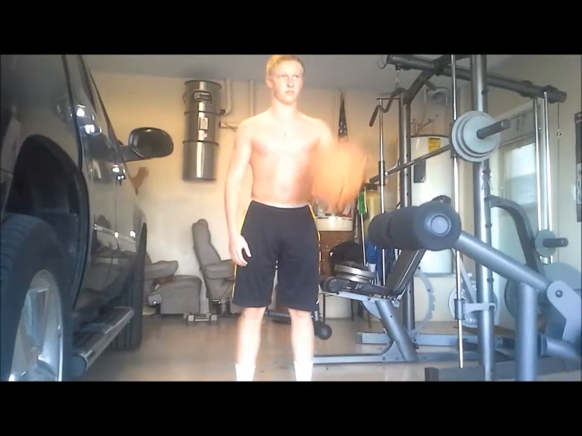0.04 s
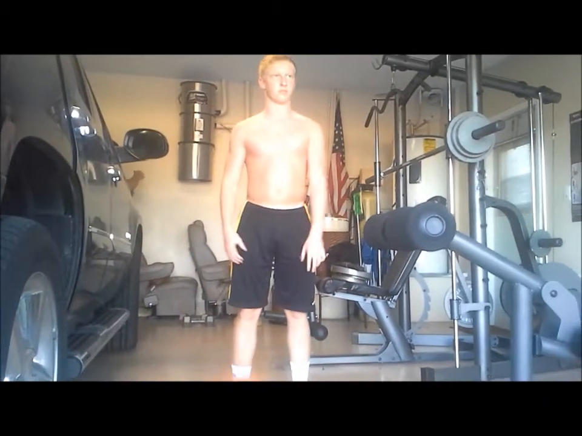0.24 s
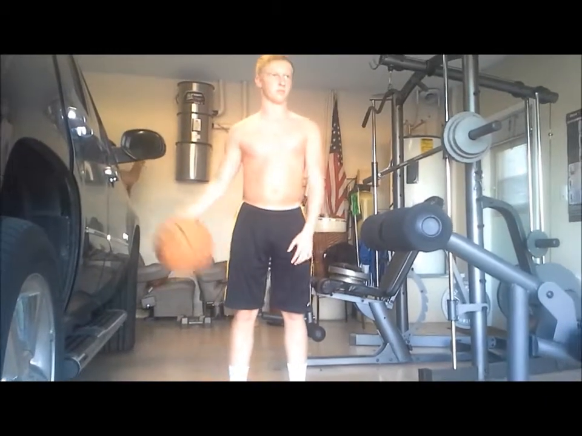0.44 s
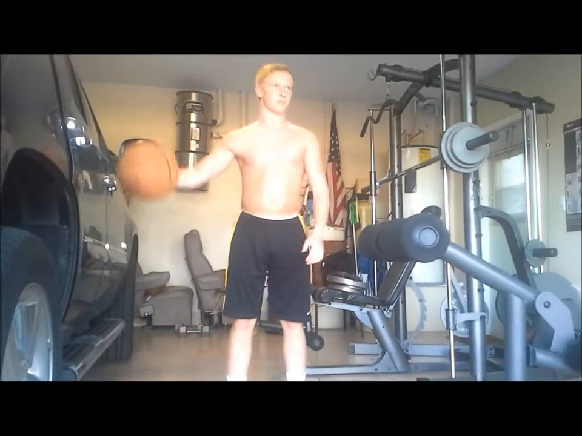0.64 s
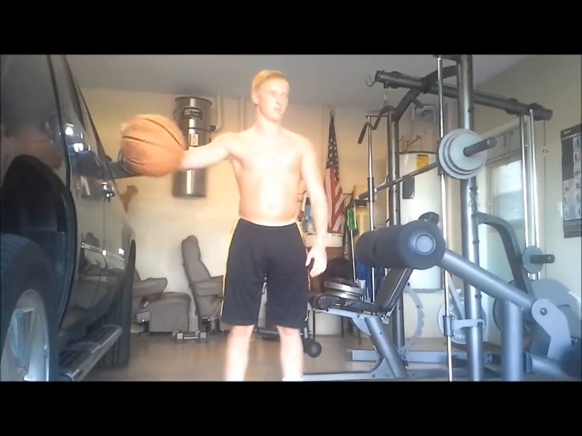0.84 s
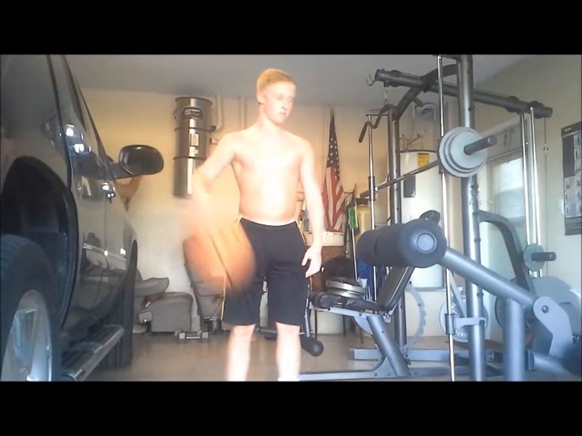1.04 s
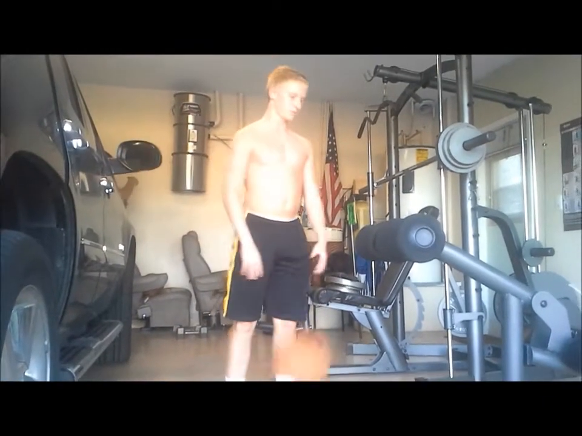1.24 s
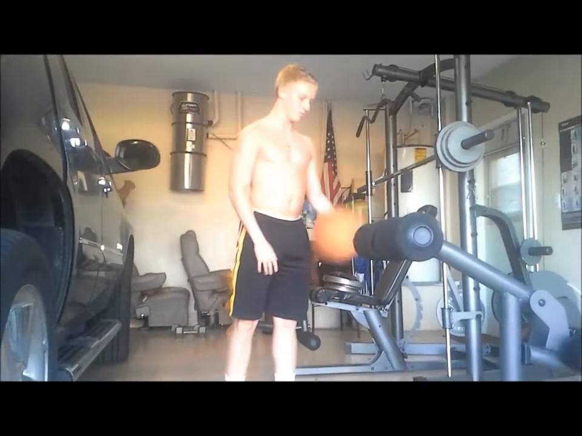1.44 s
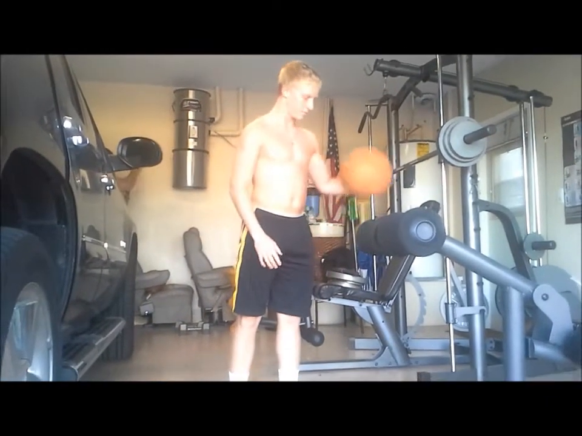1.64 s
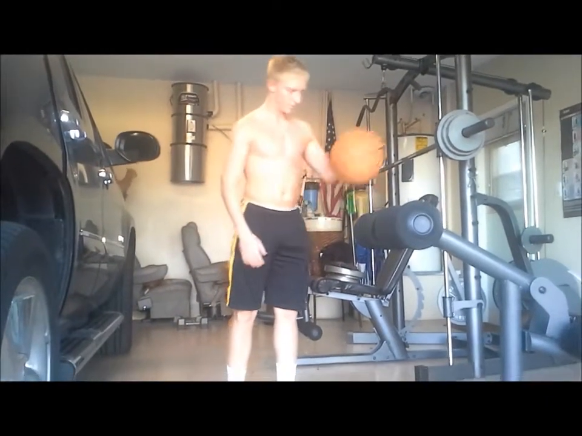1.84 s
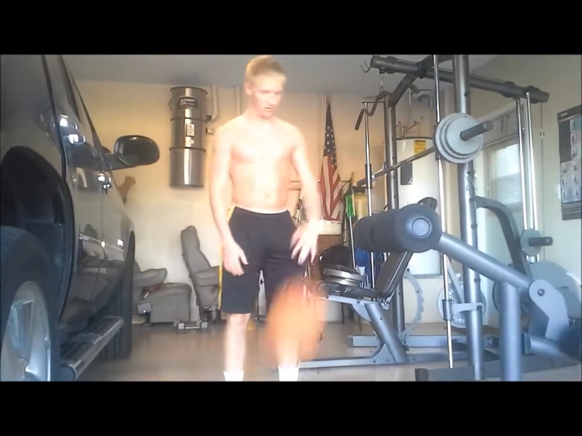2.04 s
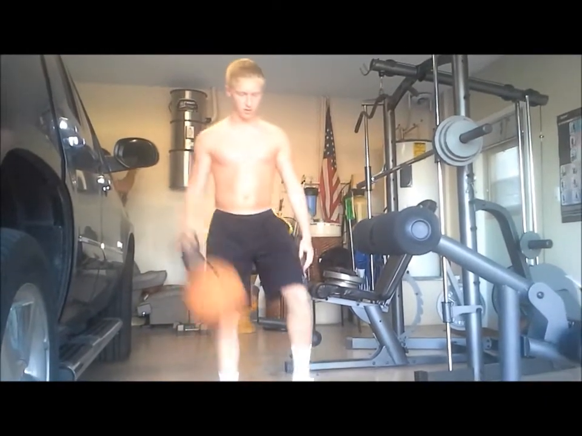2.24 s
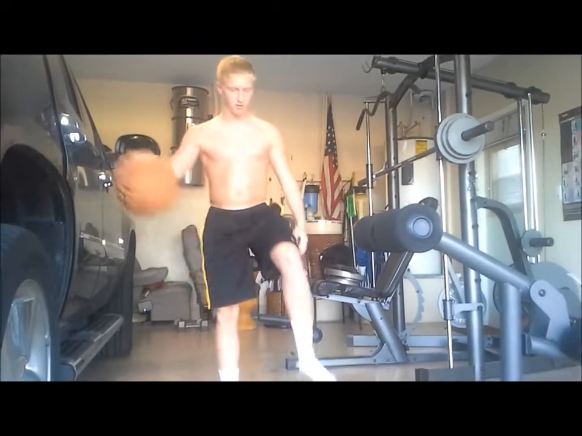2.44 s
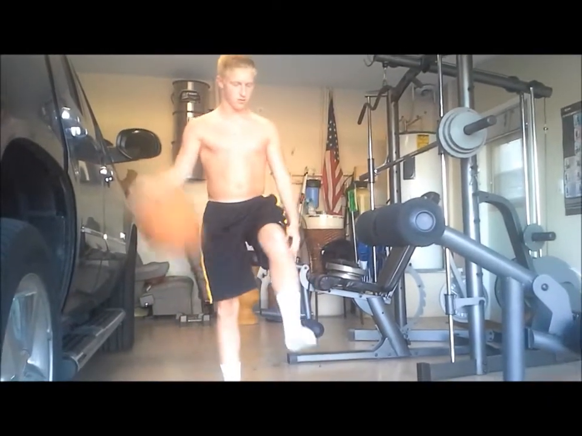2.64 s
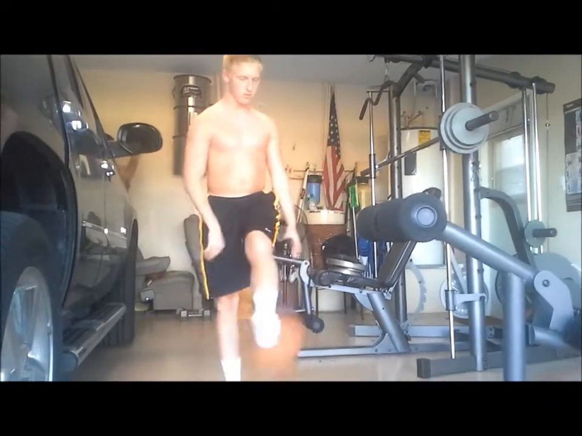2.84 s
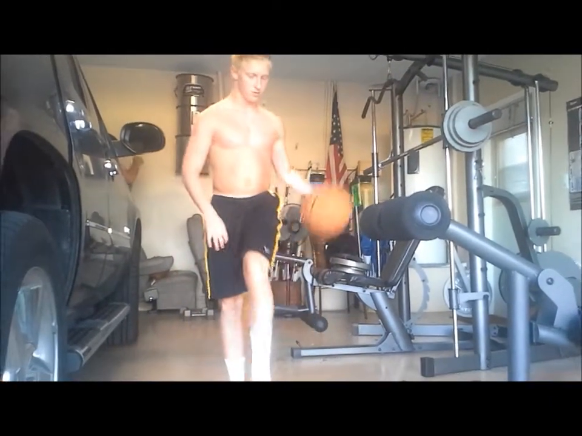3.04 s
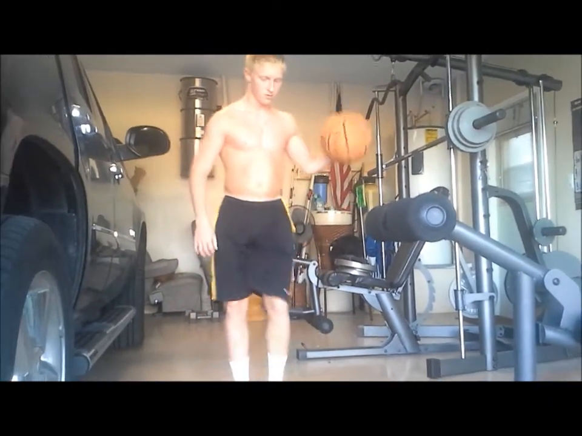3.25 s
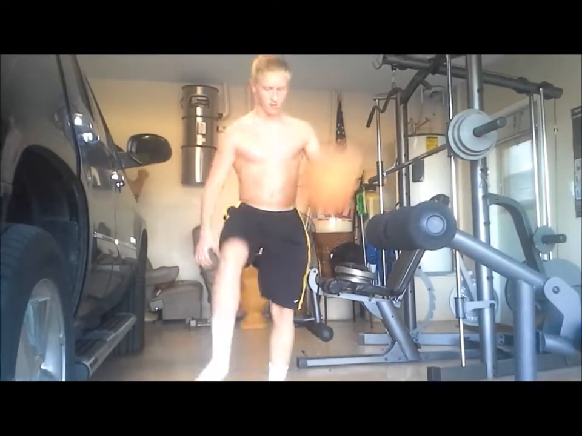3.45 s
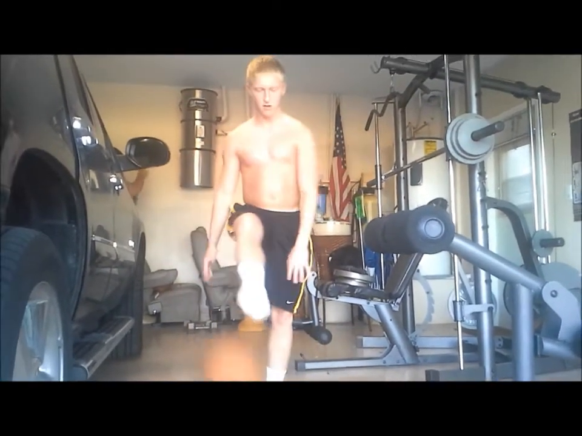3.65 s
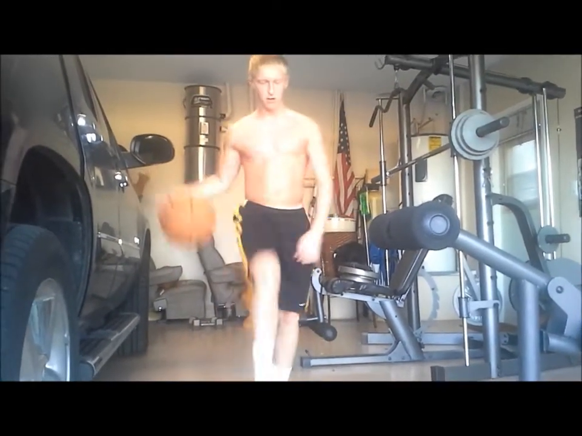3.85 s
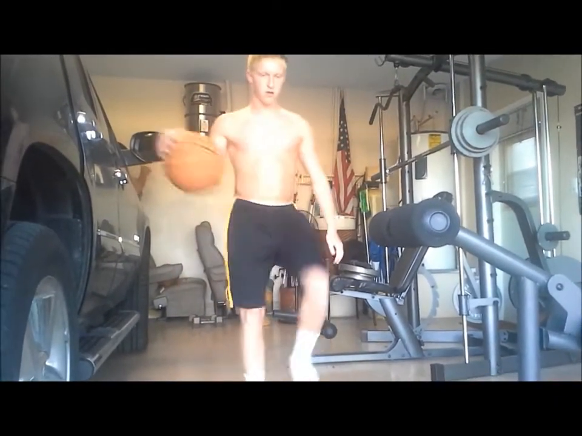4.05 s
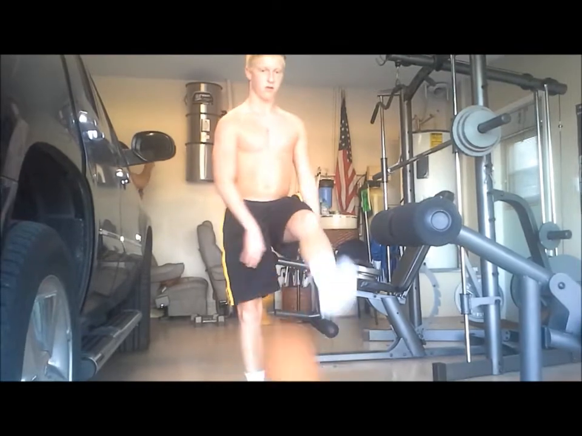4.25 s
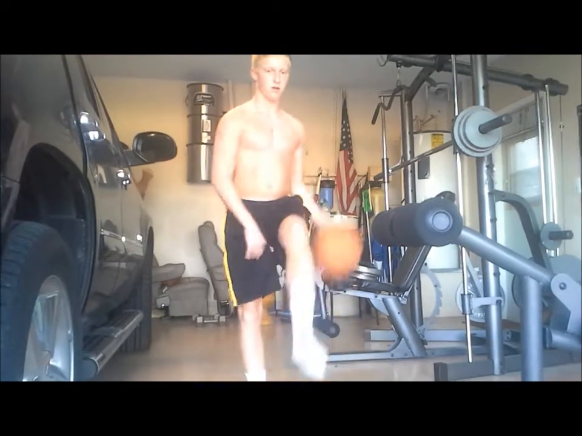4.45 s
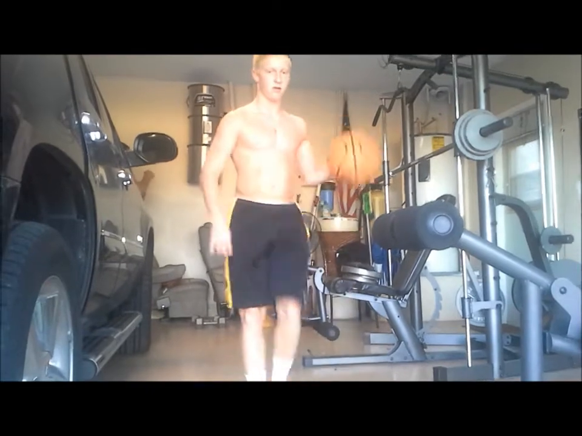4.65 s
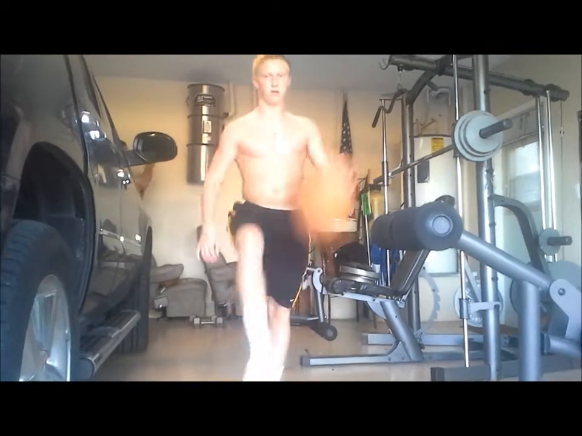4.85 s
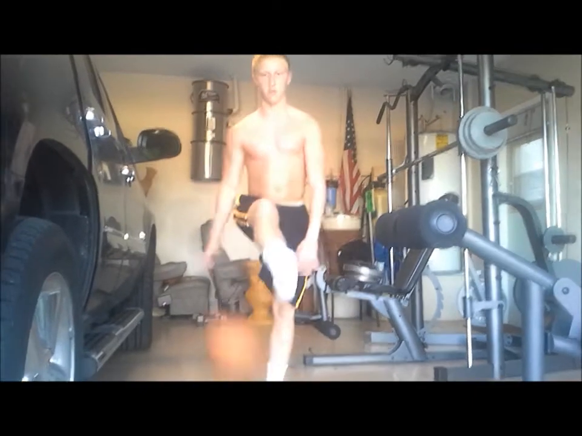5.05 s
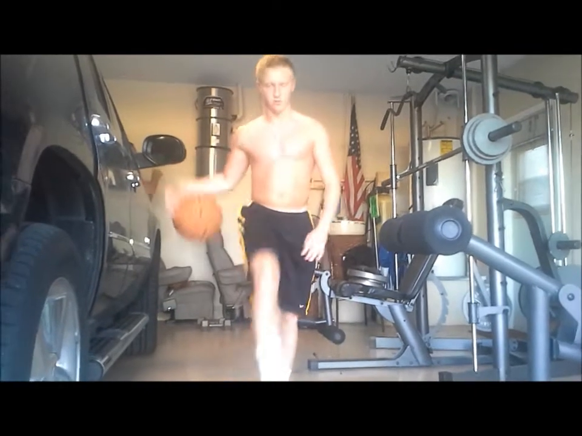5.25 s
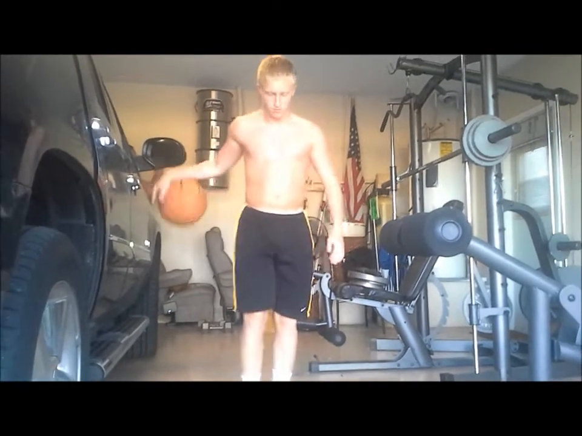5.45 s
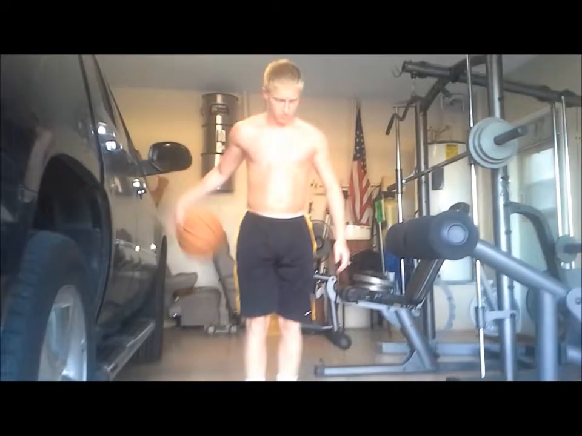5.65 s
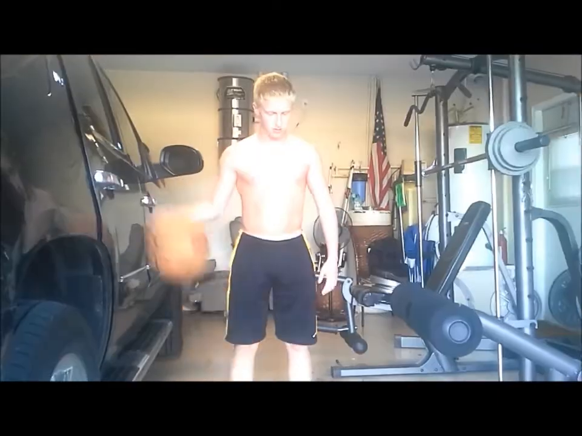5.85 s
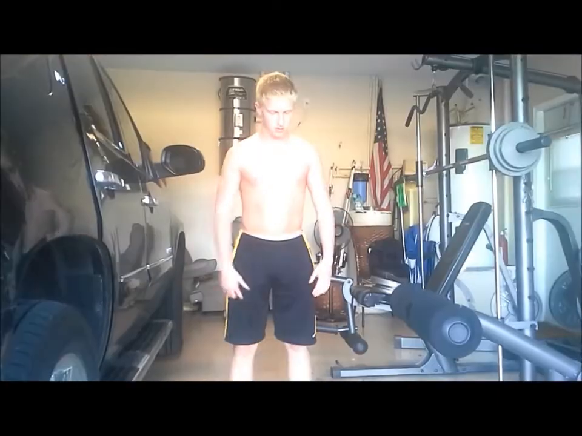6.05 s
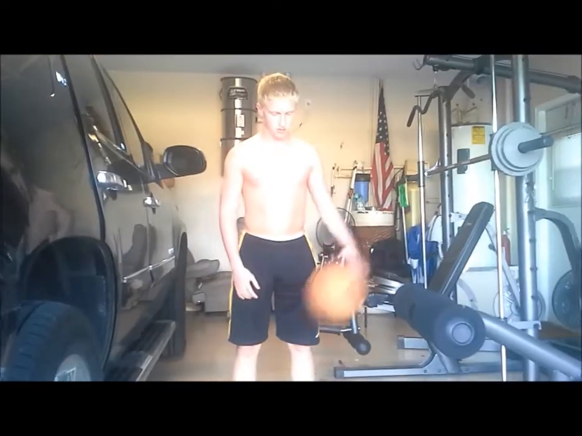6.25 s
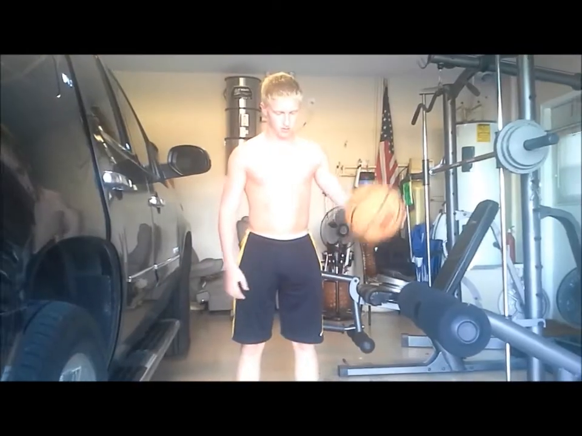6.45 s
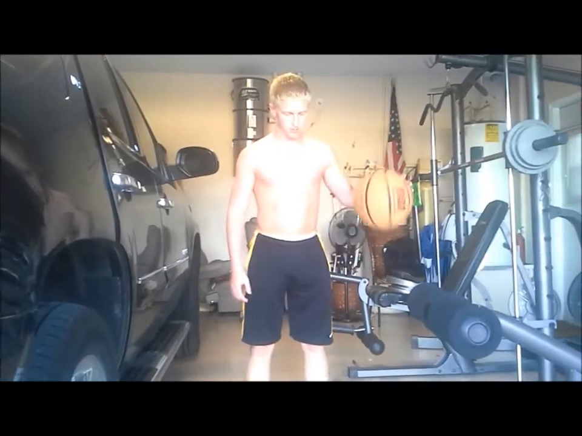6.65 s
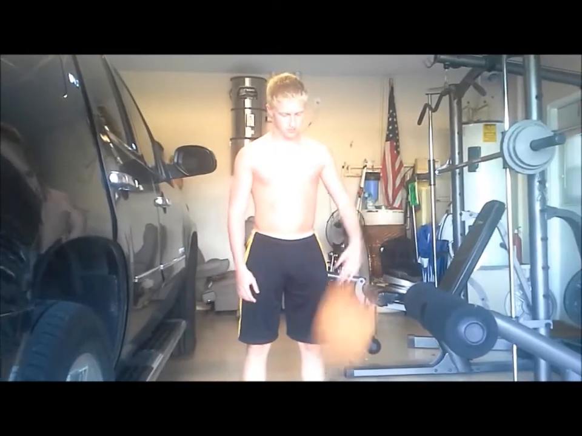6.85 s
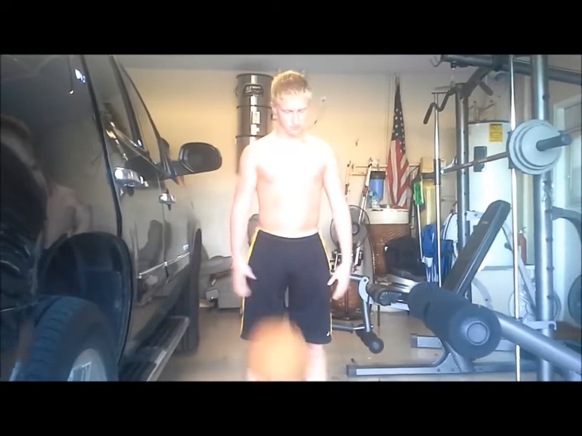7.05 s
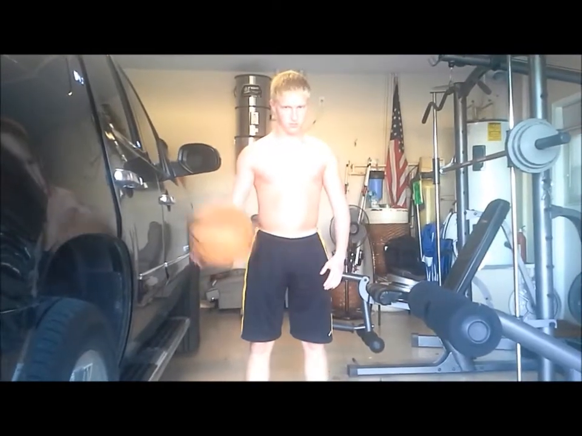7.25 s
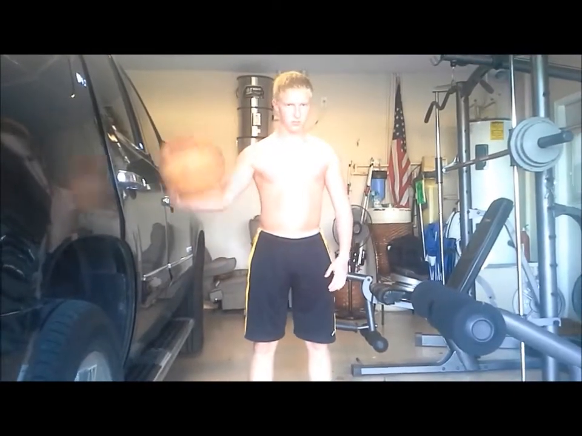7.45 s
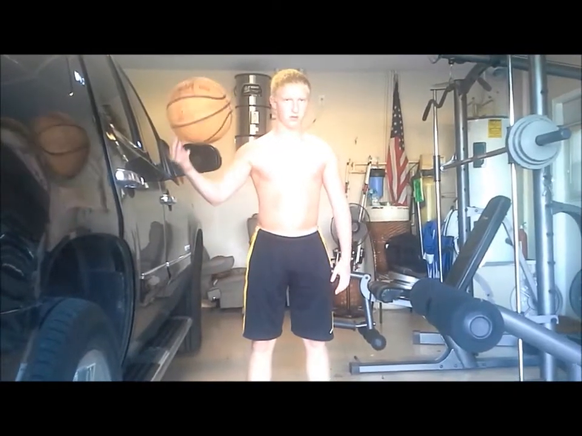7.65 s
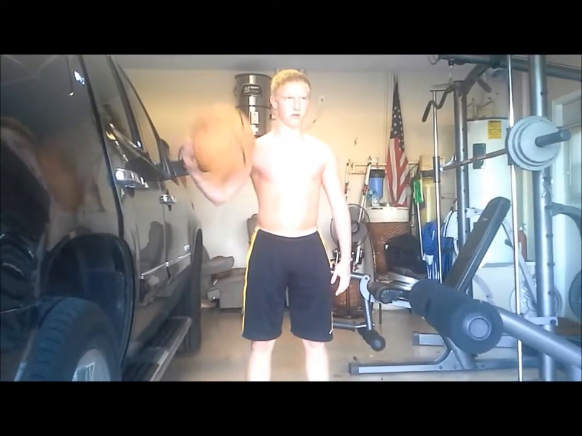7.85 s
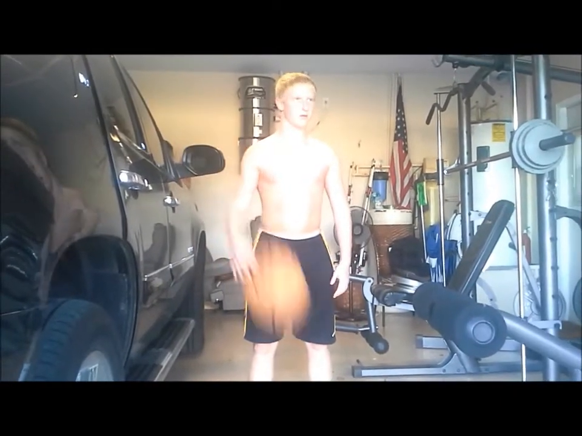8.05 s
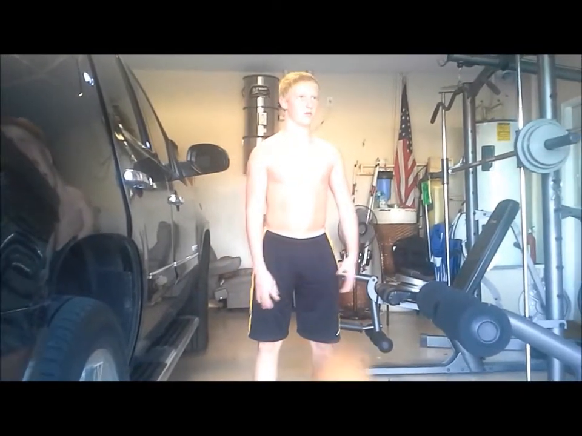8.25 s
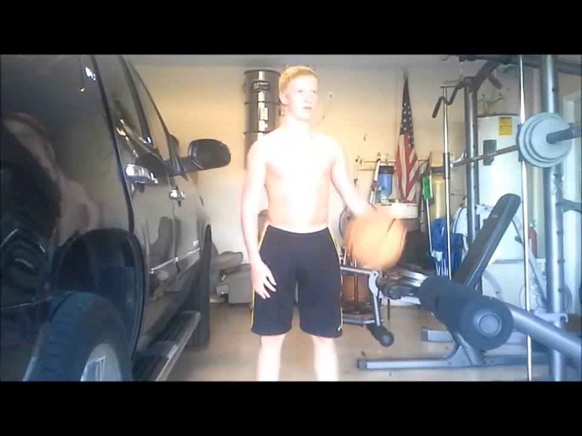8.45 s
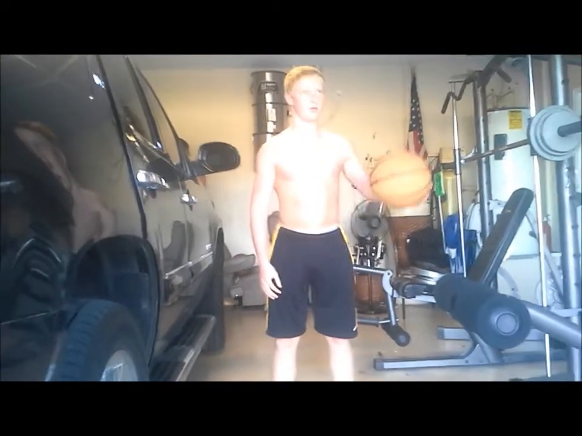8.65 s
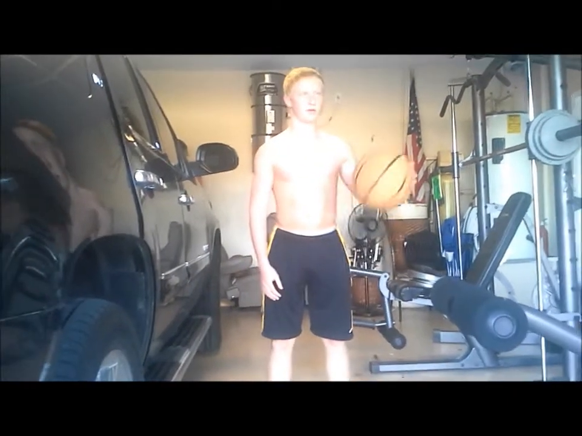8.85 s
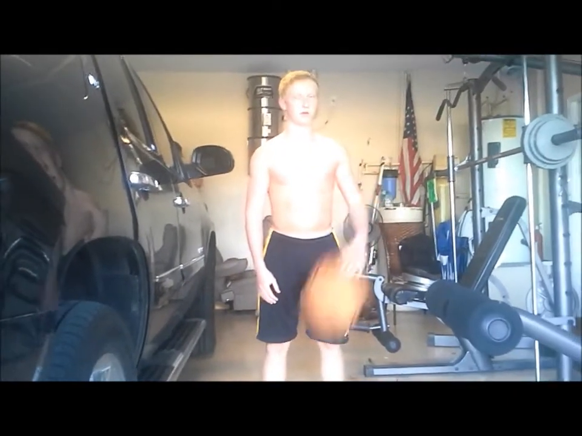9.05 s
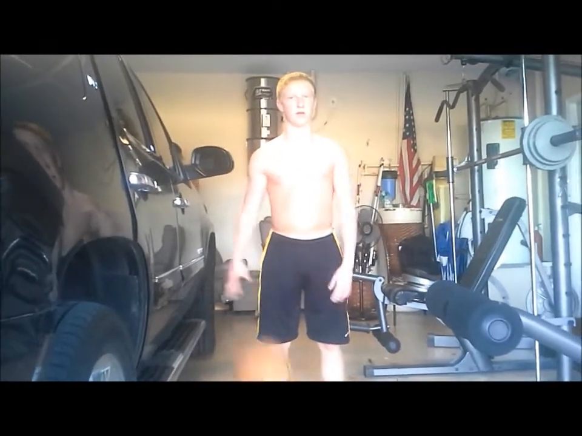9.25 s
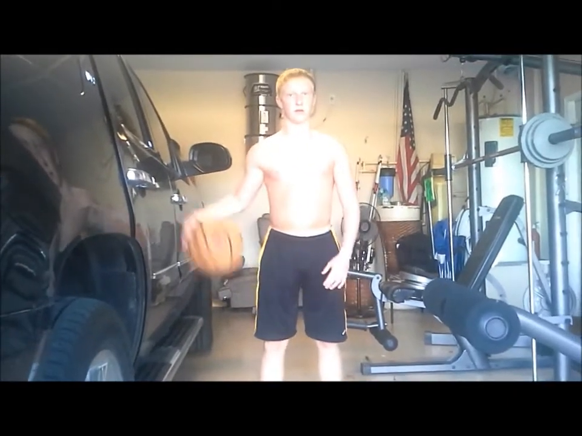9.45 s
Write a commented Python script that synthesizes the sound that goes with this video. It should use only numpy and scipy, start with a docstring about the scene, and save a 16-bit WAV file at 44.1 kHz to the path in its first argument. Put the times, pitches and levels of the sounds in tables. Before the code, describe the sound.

Sharp, boomy basketball bounces echo in a hard-walled garage with light hand slaps and shoe scuffs, dropping silent once, then resuming from another spot.

```python
"""A hard-walled garage: a basketball is dribbled on concrete, heard from one spot, then, after silence, a second.
Each bounce sums a squeezed-air pulse with room modes, a noise slap of rubber, and decaying modes for the ball's ping
and a beating steel part. Hands catch and slide as resonant noise; feet drag as dull noise and knocks are low modes.
Falling sines whistle faintly over coloured noise: a faint rumble and a hiss that swells in surges."""
import sys
import numpy as np
from scipy import signal
from scipy.fft import rfft, irfft
from scipy.io import wavfile

SR = 44100
rng = np.random.default_rng(int(sys.argv[2]) if len(sys.argv) > 2 else 0)


def file_out(sig):
    """Save sig as 16-bit WAV at sys.argv[1]."""
    # one column per channel
    cols = np.atleast_2d(sig).T
    # limit, then scale
    lim = np.clip(cols, -1, 1)
    pcm = np.round(lim * 32767).astype(np.int16)
    wavfile.write(sys.argv[1], SR, pcm)


N = 418950
TIME = np.arange(N) / SR
AGE = np.arange(SR) / SR   # the second that follows a contact

# Levels in the tables are relative: each sound's own shaping and mix gain come on top.
# thin hiss in surges, each lasting until the next: start_s, level_db, rise_s
SURGES = [(0, -39.5, .015), (0.61, -39, .03), (1.04, -32, .065), (1.671, -34, .035), (1.885, -39, .02),
          (2.28, -36.5, .06), (2.901, -36, .02), (3.551, -36, .03), (4.149, -35, .02), (4.76, -36, .03),
          (5.341, -36, .04), (6.4, -37, .03), (6.79, -34, .03), (7.001, -38, .02), (7.335, -36.5, .015),
          (7.56, -38, .02), (7.929, -34, .03), (8.14, -34.5, .04), (8.7, -38, .03), (9.08, -32.5, .04),
          (9.27, -36.5, .02)]
SURGE_FALL_S = 0.065   # back into the lull
SURGE_SAG_DB_PER_S, LULL_DB = 12.5, -13
# colour of the hiss: frequency_hz, density_db (per Hz)
HISS_COLOUR = [(800, -50.5), (2000, -24.5), (4000, -16.5), (5900, -14), (7000, -4), (8200, -1.5),
               (10000, -2.5), (13000, -4), (16000, -8)]
# colour of the rumble: frequency_hz, density_db (per Hz)
RUMBLE_COLOUR = [(20, -1.5), (60, 6), (130, 0.5), (250, -2.5), (450, -1.5), (700, -4.5), (1100, -4.5),
                 (2000, -13.5), (5000, -31)]
RUMBLE_START_DB, RUMBLE_END_DB = -62, -58   # slow growth, before the hiss's swing is added
RUMBLE_FOLLOWS = 0.3   # share of the hiss's swing

# faint falling whistles: start_s, start_pitch_hz, level_db
WHISTLES = [(0.17, 13900, -43), (1.46, 14300, -58), (2.03, 15000, -48), (2.66, 14100, -43),
            (3.30, 15200, -41), (3.95, 13700, -47), (5.73, 13700, -47.5), (8.168, 12660, -30.5)]
WHISTLE_S, WHISTLE_FALL_HZ_PER_S = 0.14, 15000

# feet shifting on the floor: start_s, length_s, level_db
SHUFFLES = [(.2, 0.15, -59), (2.574, 0.067, -41), (2.912, 0.059, -47.5), (3.381, 0.12, -41.5),
            (3.59, 0.13, -44.5), (4.167, 0.1, -46), (4.77, 0.13, -47.5), (5.566, 0.41, -46),
            (6.421, 0.13, -49.5), (7.679, 0.22, -48), (7.948, 0.23, -56)]
# colour of a dragging sole: frequency_hz, density_db (per Hz)
SHUFFLE_COLOUR = [(50, -17), (130, 12), (260, 1.5), (430, 8), (700, -4), (1000, -8.5), (1700, -12.5)]

# dull knocks: start_s, pitch_hz, level_db, t60_s
KNOCKS = [(0.213, 542, -38.5, 0.067), (2.589, 385, -39.5, 0.38), (8.665, 94, -35.5, 0.1)]

# hands on the ball, short for a catch and long for a slide:
# start_s, length_s, skin_level_db, skin_resonance_hz, pat_level_db, palm_resonance_hz
TOUCHES = [(0.333, 0.031, -64, 6000, -46.5, 2580), (0.941, 0.018, -30.5, 5600, -44.5, 1920),
           (1.088, 0.19, -28, 8100, -49.5, 2850), (1.198, 0.029, -25, 6460, -42, 3800),
           (1.721, .055, -27.5, 6600, -44, 2850), (2.144, 0.035, -32, 5850, -44, 1950),
           (2.913, 0.083, -39, 7160, -50, 3000), (3.39, 0.071, -34, 8400, -35.5, 900),
           (3.643, 0.042, -25, 6700, -41, 3080), (4.242, .03, -24.5, 6740, -37.5, 4240),
           (4.779, 0.065, -37, 6460, -45, 2960), (4.851, 0.038, -30, 6560, -48.5, 3050),
           (5.386, .11, -34, 6900, -46, 3040), (5.533, .021, -28.5, 6150, -44, 3000),
           (6.813, 0.051, -35.5, 5100, -36, 4180), (7.365, 0.024, -31, 6700, -31, 3800),
           (7.954, 0.035, -29.5, 6800, -33, 3750), (7.96, 0.021, -46, 6100, -40.5, 1980),
           (9.071, 0.044, -33, 5400, -38, 2800)]
# colour of skin on rubber: frequency_hz, density_db (per Hz)
SKIN_COLOUR = [(3000, -39.5), (4200, -1.5), (5200, 0.5), (6500, 2.5), (8000, -0.5), (10000, -3.5),
               (15000, -20.5)]
# colour of the palm's pat: frequency_hz, density_db (per Hz)
PAT_COLOUR = [(500, -28.5), (1000, -3.5), (1600, -4), (2400, 0.5), (3000, -1), (4200, 0.5), (5500, -10),
              (8000, -20)]
# colour of the ball's hollow answer: frequency_hz, density_db (per Hz)
HOLLOW_COLOUR = [(50, -12.5), (120, 5.5), (250, -7), (400, 1), (650, -13), (1200, -12.5)]
TOUCH_RISE_SHARE = 0.23   # part of a touch spent pressing on
HOLLOW_DB = -23.5   # the hollow answer against the pat

# ball on floor: start_s, thump_level_db, slap_level_db, brightness_db, steel_level_db
BOUNCES = [(0.423, -1.5, 1, -6.5, -38), (1.368, -6, -1.5, -6, -49.5), (2.289, -2, 0.5, -2, -39.5),
           (2.9716, -2.5, -2, 3.5, -41.5), (3.792, 0.5, 1.85, -1, -41), (4.427, -1.5, -0.5, 1, -40.5),
           (5.147, 1, 1, -11, -43), (7.1146, -3, 0, -5, -50), (8.347, -5, 0, -1, -46),
           (9.339, -3.5, -1.5, -2, -60)]
# standing waves of the garage: pitch_hz, first_spot_level_db, second_spot_level_db, t60_s
ROOM_MODES = [(59.3, -22, -24, 0.67), (67, -31, -27, 0.82), (88.1, -16, -24.5, 0.5),
              (107.2, -23.5, -24, 0.67), (107.4, -21.5, -14, 0.12), (169, -33.5, -10.5, 0.47),
              (188.5, -27, -24, 0.36), (214, -30, -43, 0.35), (254, -29.5, -24, 0.29),
              (310, -30.5, -44, 0.19), (381, -16, -25, 0.42), (498, -25, -33, 0.58)]
# first reflections: delay_s, level_db
ECHOES = [(.0028, -13.5), (0.0108, 0.5), (0.0179, -12.5), (.0265, -11.5)]
# colour of the slap at the first spot: frequency_hz, density_db (per Hz)
SLAP_FIRST = [(45, -8), (100, 5.5), (300, 2.5), (500, -4), (680, -6.5), (1050, 0.5), (1600, -2), (3000, -1),
              (5400, 0), (6400, 5), (8000, 2.5), (10000, -4.5), (12500, -11.5), (16000, -13.5)]
# colour of the slap at the second spot: frequency_hz, density_db (per Hz)
SLAP_SECOND = [(45, -16), (110, 1.5), (280, 5.5), (500, -4), (730, -12), (1100, -3.5), (2100, -2.5),
               (3800, 3.5), (5200, 0.5), (5900, -2), (7700, 1.5), (10000, -2.5), (12500, -7.5),
               (16000, -21.5)]
# the garage's decay time by band: frequency_hz, t60_s
GARAGE_T60 = [(60, 0.5), (150, 0.45), (400, 0.47), (1000, 0.51), (2500, 0.53), (6000, 0.53), (9000, 0.47),
              (15000, 0.29)]
# the ball's air and shell: pitch_hz, first_spot_level_db, second_spot_level_db, t60_s
BALL_MODES = [(897, -27, -37, 0.3), (993, -40, -33, .3), (1079, -27, -27.5, 0.36), (1215, -28.5, -35, 0.47),
              (1534, -36.5, -25.5, 0.14), (3510, -30.5, -37, .5), (3830, -34, -32, 0.46),
              (4940, -35, -34, .45)]
STEEL_HZ, STEEL_T60_S = 2877, 2.1
STEEL_BEAT_HZ, STEEL_LASTS_S = 5.4, 0.72   # spacing of the two close modes, and how long they sound

# brief sinkings of the whole level: lowest_s, depth_db
DIPS = [(.411, -38), (6.803, -28), (7.94, -40), (9.058, -22)]
DIP_FALL_S, DIP_RETURN_S = 0.052, 0.01
GAP_START_S, GAP_END_S = 5.814, 6.470   # silence between the two spots
CUTOFF_HZ = 15850


def from_db(db):
    """Decibels to amplitude."""
    return 10 ** (np.asarray(db) / 20)


def rms_one(x):
    """Scale a sound to an rms of 1."""
    return x / np.sqrt(np.mean(x ** 2) + 1e-20)


def at_hz(points, hz):
    """Read a curve between its points on a log frequency axis."""
    f, value = np.transpose(points)
    return np.interp(np.log(hz + 1e-9), np.log(f), value)


def add(out, s, sound):
    """Mix a sound in at a time."""
    at = int(round(s * SR))
    out[at:at + len(sound)] += sound[:N - at]


def noise(spectrum, size, uneven_db, grain_hz=140):
    """Noise of a given colour with chance peaks and valleys, falling away above its last point; rms 1."""
    hz = np.fft.rfftfreq(size, 1 / SR)
    peaks = np.interp(hz / grain_hz, np.arange(1024), rng.standard_normal(1024))
    unevenness = uneven_db * peaks * hz / (hz + 600)   # smoother in the bass
    top_fall = np.maximum(1, hz / spectrum[-1][0]) ** 2
    gain = from_db(at_hz(spectrum, hz) + unevenness) / top_fall
    return rms_one(irfft(rfft(rng.standard_normal(size)) * gain, size))


def ring(hz, t60):
    """A struck mode: a sine of height 1 that dies by 60 dB in t60 seconds."""
    return np.sin(2 * np.pi * hz * AGE) * np.exp(-np.log(1000) * AGE / t60)


def swell(length):
    """A smooth rise and fall."""
    return np.sin(np.pi * np.minimum(AGE / length, 1))


def resonate(x, hz, width_hz, boost_db):
    """One resonance stands out of a sound; rms 1."""
    peak = signal.lfilter(*signal.iirpeak(hz, hz / width_hz, fs=SR), x)
    return rms_one(x + from_db(boost_db) * peak)


def brighten(x, db, corner_hz):
    """A treble shelf: the highs are lifted or cut by adding a scaled high-pass."""
    highs = signal.sosfilt(signal.butter(1, corner_hz, "high", fs=SR, output="sos"), x)
    return x + (from_db(db) - 1) * highs


def surges():
    """Level of the hiss in dB: each surge rises quickly out of a lull, sags, and sinks back before the next."""
    starts, top_db, rise = np.transpose(SURGES)
    current = np.maximum(np.searchsorted(starts, TIME, side="right") - 1, 0)
    age = np.maximum(TIME - starts[current], 0)
    left = np.append(starts[1:], np.inf)[current] - TIME
    lull = np.maximum(np.exp(-age / rise[current]), np.exp(-left / SURGE_FALL_S))
    return top_db[current] - SURGE_SAG_DB_PER_S * age + LULL_DB * lull


def hiss():
    """Thin noise; every surge has a faint colour of its own, and each burst lasts a second at most."""
    out = np.zeros(N)
    starts = [s for s, _, _ in SURGES]
    for start, end in zip(starts, starts[1:] + [np.inf]):
        burst = noise(HISS_COLOUR, SR, uneven_db=3.0, grain_hz=91.7)
        add(out, max(start, 0), burst * (AGE < end - start))
    return out


def background():
    """A thin hiss that swells and sinks, and a low rumble that goes part of the way with it."""
    hiss_db = surges()
    swing_db = hiss_db - hiss_db.mean()
    rumble_db = np.linspace(RUMBLE_START_DB, RUMBLE_END_DB, N) + RUMBLE_FOLLOWS * swing_db
    rumble = noise(RUMBLE_COLOUR, N, uneven_db=4.0)
    return from_db(rumble_db) * rumble + from_db(hiss_db + 2.5) * hiss()


def whistles():
    """Very high, unsteady tones slide down through the hiss: falling sines times slow noise."""
    out = np.zeros(N)
    for s, from_hz, db in WHISTLES:
        pitch_hz = from_hz - WHISTLE_FALL_HZ_PER_S * np.minimum(AGE, WHISTLE_S)
        phase = 2 * np.pi * np.cumsum(pitch_hz) / SR
        waver = noise([(20, -12), (300, -3)], SR, uneven_db=-2)
        add(out, s, from_db(db) * np.sin(phase) * waver * swell(WHISTLE_S))
    return out


def feet():
    """Soles drag dully over the concrete: low noise that rises and falls."""
    out = np.zeros(N)
    for s, length, db in SHUFFLES:
        drag = noise(SHUFFLE_COLOUR, SR, uneven_db=6.0, grain_hz=52.4)
        add(out, s, from_db(db) * drag * swell(length))
    return out


def knocks():
    """Soft bumps, each leaving one low note in the room."""
    out = np.zeros(N)
    soft_onset = 1 - np.exp(-AGE / 0.0015)
    for s, hz, db, t60 in KNOCKS:
        add(out, s, from_db(db) * ring(hz, t60) * soft_onset)
    return out


def hands():
    """Skin brushes pebbled rubber, air rings under the palm, the ball answers hollowly; the room carries on."""
    out = np.zeros(N)
    for s, length, skin_db, skin_hz, pat_db, palm_hz in TOUCHES:
        brush = noise(SKIN_COLOUR, SR, uneven_db=4.0, grain_hz=232)
        skin = resonate(brush, skin_hz, width_hz=1300, boost_db=7)
        palm_air = noise(PAT_COLOUR, SR, uneven_db=4.0, grain_hz=220)
        pat = resonate(palm_air, palm_hz, width_hz=600, boost_db=10)
        hollow = from_db(HOLLOW_DB) * noise(HOLLOW_COLOUR, SR, uneven_db=9.5)
        press = np.minimum(AGE / (TOUCH_RISE_SHARE * length), 1)
        after = np.maximum(AGE - length, 0)
        release = 0.15 * np.exp(-after / 0.013) + 0.5 * np.exp(-after / 0.083)   # quick let-go, room tail
        touch = from_db(skin_db) * skin + from_db(pat_db) * (pat + hollow)
        add(out, s, touch * press * release)
    return out


def reflect(x):
    """Car, ceiling and walls return a sound one after another."""
    return x + sum(from_db(db) * np.interp(AGE - delay, AGE, x, left=0) for delay, db in ECHOES)


def die_away(x, hold):
    """The room holds a sound briefly, then each band dies at its own rate."""
    hz = np.fft.rfftfreq(len(x), 1 / SR)
    spectrum = rfft(x)
    late = np.hypot(AGE, hold) - hold
    out = 0
    for centre, t60 in GARAGE_T60:
        # overlapping triangular bands that add up to the whole
        share = at_hz([(f, float(f == centre)) for f, _ in GARAGE_T60], hz)
        out = out + irfft(spectrum * share, len(x)) * from_db(-60 * late / t60)
    return out


def thump(second_spot, contact_s):
    """The ball flattens and springs back: suction, pressure, suction; the room's standing waves boom on."""
    squeeze = -np.cos(2 * np.pi * AGE / contact_s) * (AGE < contact_s)
    squeeze = signal.sosfilt(signal.butter(1, 700, fs=SR, output="sos"), squeeze)
    boom = 0
    for k, (hz, first_db, second_db, t60) in enumerate(ROOM_MODES):
        mode_db = second_db if second_spot else first_db
        boom = boom + (-1) ** k * from_db(mode_db) * ring(hz, t60)   # alternating polarity
    build_up = 1 - np.exp(-AGE / 0.0049)
    return from_db(-12.0) * reflect(squeeze) + from_db(-6.5) * boom * build_up


def ping(second_spot):
    """The ball's air and shell ring, a little differently at each contact."""
    out = 0
    for hz, first_db, second_db, t60 in BALL_MODES:
        mode_db = (second_db if second_spot else first_db) + rng.normal(0, 1.1)
        out = out + from_db(mode_db) * rng.choice([-1, 1]) * ring(hz, t60)
    return out


def slap(second_spot, bright_db):
    """Rubber cracks on concrete and the ball pings; the crack scatters into a dense tail."""
    colour = SLAP_SECOND if second_spot else SLAP_FIRST
    crack = brighten(noise(colour, SR, uneven_db=-1.0), db=10.0, corner_hz=12000) * np.exp(-AGE / 0.0014)
    tail = die_away(noise(colour, SR, uneven_db=2.5, grain_hz=59.7), hold=0.029)
    tail = tail * (1 - np.exp(-AGE / 0.0029))
    rubber = from_db(-7.5) * reflect(crack) + from_db(-9.0) * tail
    return brighten(rubber, bright_db, corner_hz=4650) + from_db(1.0) * ping(second_spot)


def steel_ring():
    """A steel part rings in sympathy: two close modes beat slowly and fade out."""
    steel = ring(STEEL_HZ, STEEL_T60_S) - 0.7 * ring(STEEL_HZ + STEEL_BEAT_HZ, STEEL_T60_S)
    return steel * np.maximum(1 - (AGE / STEEL_LASTS_S) ** 4, 0)


def dribble():
    """Every bounce is a thump and a slap on the floor, with the steel ringing along."""
    out = np.zeros(N)
    steel = steel_ring()
    for s, thump_db, slap_db, bright_db, steel_db in BOUNCES:
        second_spot = s > GAP_END_S
        add(out, s, from_db(thump_db) * thump(second_spot, contact_s=0.0069))
        add(out, s, from_db(slap_db) * slap(second_spot, bright_db))
        add(out, s, from_db(steel_db) * steel)
    return out


def scene():
    """All the layers summed into one channel."""
    return (background() + whistles() + feet() + knocks() + hands() + dribble())[None]


def dropouts():
    """The level dips briefly four times, and all but vanishes between the two spots."""
    dip_db = sum(np.interp(TIME, [s - DIP_FALL_S, s, s + DIP_RETURN_S], [0, depth, 0]) for s, depth in DIPS)
    sounding = (TIME < GAP_START_S) | (TIME > GAP_END_S)
    return from_db(dip_db) * np.maximum(sounding, 1e-6)


def record(dry):
    """The level dips and gaps, peaks are rounded softly, and the extreme treble is cut steeply."""
    ceiling = 1.2
    rounded = ceiling * np.tanh(from_db(0.65) * dry * dropouts() / ceiling)
    return signal.sosfilt(signal.ellip(10, 0.1, 90, CUTOFF_HZ, fs=SR, output="sos"), rounded)


dry = scene()
out = record(dry)
file_out(out)
```